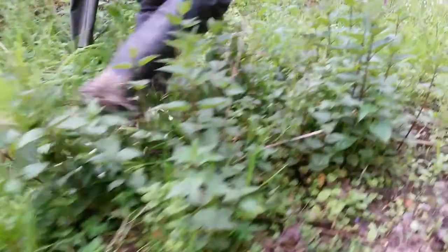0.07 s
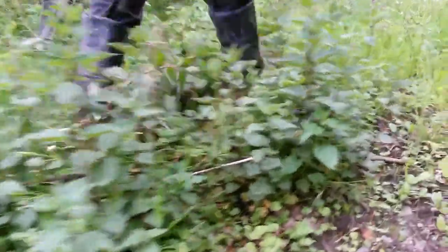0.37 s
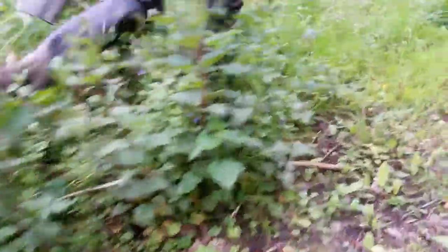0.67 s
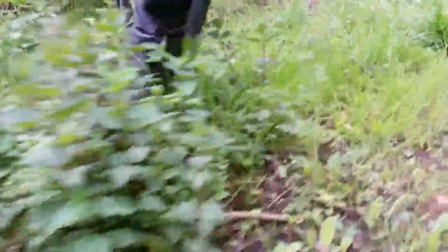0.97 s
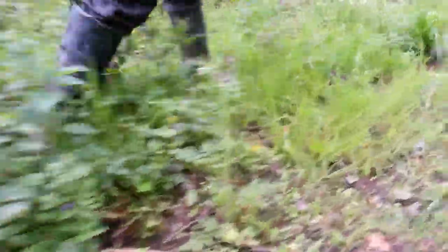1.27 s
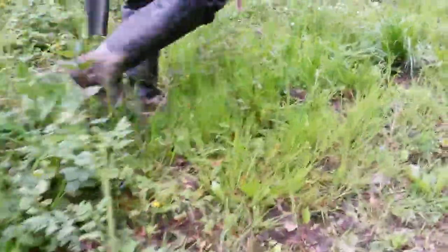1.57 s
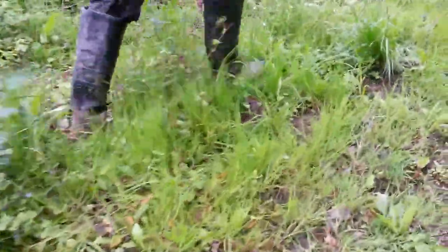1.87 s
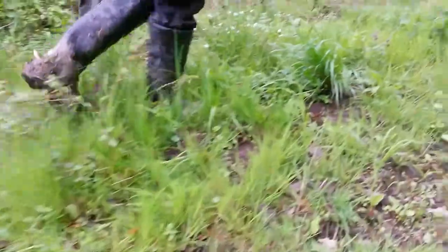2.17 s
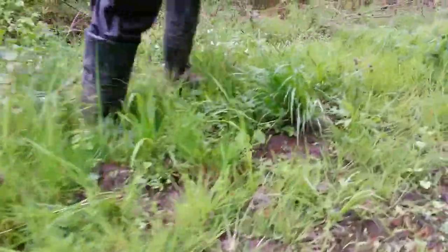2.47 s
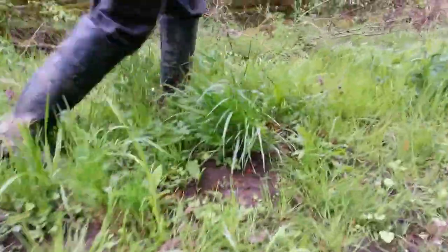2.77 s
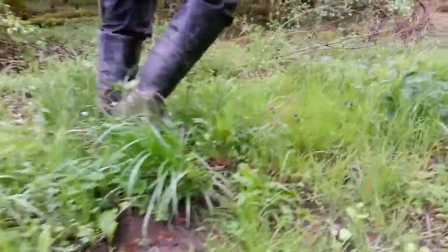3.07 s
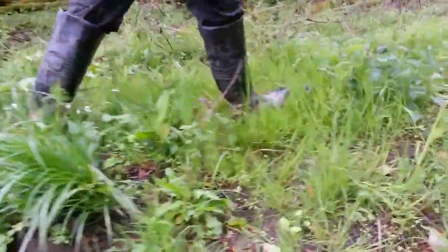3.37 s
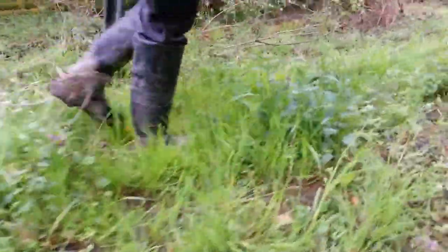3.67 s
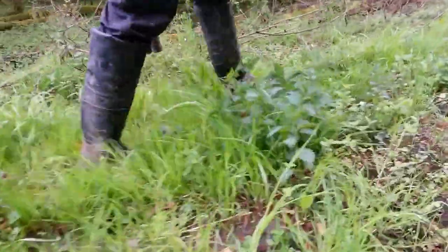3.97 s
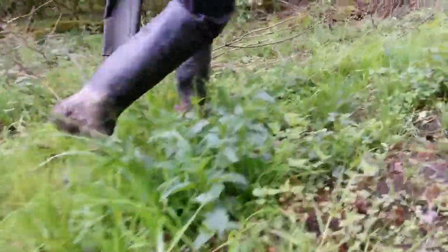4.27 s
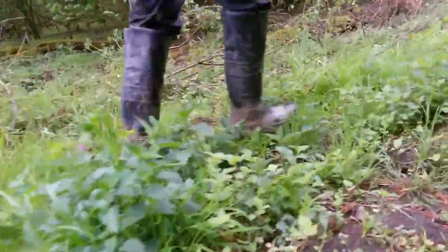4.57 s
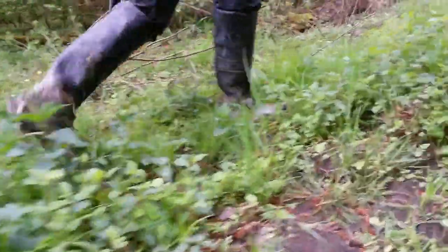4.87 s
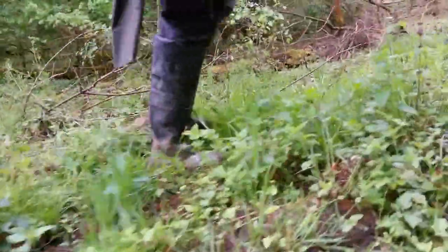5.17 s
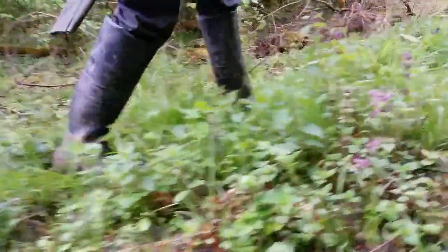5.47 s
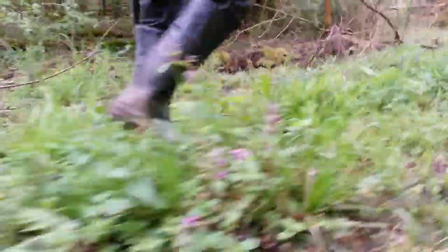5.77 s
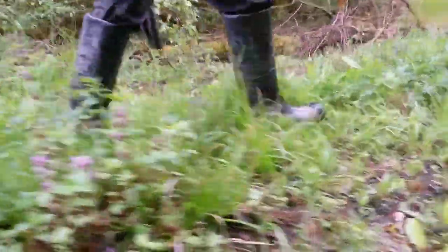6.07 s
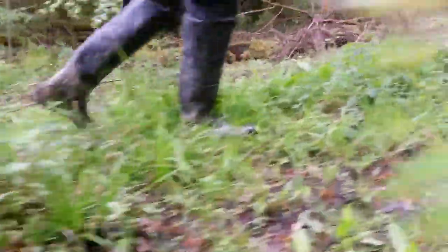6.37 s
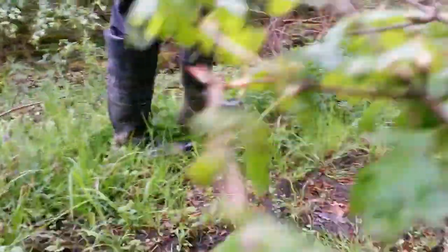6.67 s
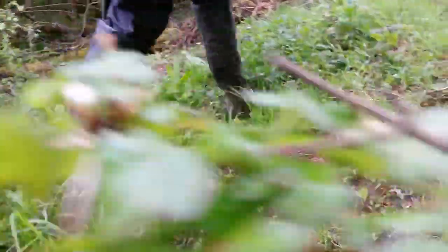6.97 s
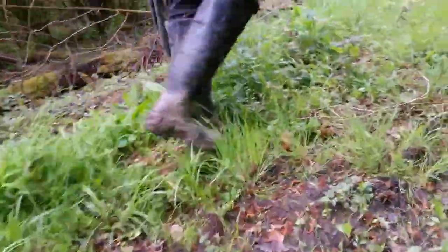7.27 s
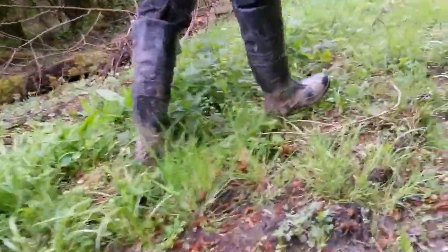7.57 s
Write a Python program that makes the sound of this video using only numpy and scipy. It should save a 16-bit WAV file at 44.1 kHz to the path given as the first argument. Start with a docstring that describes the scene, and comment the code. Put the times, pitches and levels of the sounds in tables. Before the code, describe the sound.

From the start, rubber boots push through grass and nettles at a forest edge, making uneven hissing swishes with a fine crackle of crushed stems, strongest in the first second. A soft, low air rumble puffs on the hand-held microphone following along. Twigs snap sharply just before 1 second, along with a knock of a sole on hard ground. The swishing continues, with more cracks around 3.2 and 3.7 seconds and a cluster of knocks and snaps from 5.3 to 5.6 seconds. From about 5.7 seconds a small, distant bird gives a few faint falling whistles. At 6.5 seconds the leaves of a low branch slap and scrape the microphone on the right, close and loud, with more taps until about 7.2 seconds. The steps are by then much fainter, and a quiet rustle lasts until nearly 8 seconds.

```python
"""Grass and nettles swish against rubber waders as someone walks along a forest edge.
Sliding friction makes the blades hiss and the crushed stems crackle, while air rumbles around a
hand-held camera that follows. Twigs crack by sudden fracture, and soles knock on roots and hard ground.
Later a small bird whistles far off, blurred by scattering from the trees. Near the end the leaves
of a low branch slap and scrape the camera at its right microphone port."""
import sys
import numpy as np
from scipy import signal
from scipy.fft import rfft, irfft, next_fast_len
from scipy.io import wavfile
from scipy.ndimage import uniform_filter1d, map_coordinates

SR = 44100
rng = np.random.default_rng(int(sys.argv[2]) if len(sys.argv) > 2 else 0)


def persist_wave(psi):
    """Save psi, clipped to +-1, as 16-bit WAV."""
    counts = np.round(np.clip(psi, -1, 1) * 32767).astype(np.int16)
    wavfile.write(sys.argv[1], SR, np.atleast_2d(counts).T)


N = 344421
TIME = np.arange(N) / SR


def from_db(db):
    """Amplitude ratio of a level in decibels."""
    return 10 ** (np.asarray(db) / 20)


def rms_one(x):
    """Normalisation: the mean of the channels gets rms 1."""
    return x / np.sqrt(np.mean(np.atleast_2d(x).mean(axis=0) ** 2) + 1e-20)


def unit_energy(pair):
    """Normalisation: each channel gets energy 1."""
    return pair / np.sqrt(np.sum(pair ** 2, axis=1, keepdims=True))


def in_time(curve):
    """Linear interpolation of a curve at every sample."""
    return np.interp(TIME, *np.transpose(curve))


def at_hz(points, hz):
    """Interpolation on a logarithmic frequency axis."""
    f, value = np.transpose(points)
    return np.interp(np.log(hz + 1), np.log(f + 1), value)


def add(track, s, sound):
    """Superposition: a short sound joins a track at time s."""
    i = int(s * SR)
    track[..., i:i + sound.shape[-1]] += sound[..., :N - i]


def band(x, hz, kind, order=2):
    """Butterworth filtering, maximally flat in the passband."""
    return signal.sosfilt(signal.butter(order, hz, kind, fs=SR, output="sos"), x + 1e-18)


def colour(x, spectrum, share=1, size=2048):
    """Minimum-phase filtering by a share of a spectrum's decibel values."""
    gain = from_db(share * at_hz(spectrum, np.linspace(0, SR / 2, size // 2 + 1)))
    cepstrum = irfft(np.log(gain))
    cepstrum[1:size // 2] *= 2   # folding the cepstrum makes the response causal
    cepstrum[size // 2 + 1:] = 0
    response = irfft(np.exp(rfft(cepstrum)))
    return signal.oaconvolve(np.atleast_2d(x), response[None], axes=1)[:, :N]


def drift(rate):
    """Random modulation: a line through Gaussian values drawn `rate` times a second."""
    return np.interp(TIME * rate, np.arange(N), rng.standard_normal(N))


# Likeness of the sound at the two ports: (frequency [Hz], correlation [0 to 1])
PORT_COHERENCE = [(60, 1), (300, 0.87), (1000, 0.63), (2500, 0.19), (6000, 0.19), (15000, 0.21)]
def spread(pair):
    """Spatial coherence: two independent signals are mixed to be more alike at long wavelengths."""
    size = next_fast_len(N)
    alike = np.clip(at_hz(PORT_COHERENCE, np.linspace(0, SR / 2, size + 1)), -.99, .99)
    angle = np.arcsin(alike) / 2
    spectra = rfft(pair, 2 * size)
    return irfft(np.cos(angle) * spectra + np.sin(angle) * spectra[::-1])[:, :N]


def crackle(per_s, size_db, grain_s):
    """Shot noise: tiny random contacts of uneven size each release a decaying burst."""
    contacts = rng.random(N) < per_s / SR
    sizes = from_db(size_db * np.minimum(rng.exponential(1, N), 4))
    power = signal.lfilter([1], [1, -np.exp(-1 / (grain_s * SR))], contacts * sizes ** 2 + 1e-18)
    return rms_one(np.sqrt(power) * rng.standard_normal((2, N)))


def friction(per_s, size_db, grain_s, smooth_db, flutter_db):
    """Stick-slip friction: many blades slide smoothly while single ones catch and let go."""
    sliding = from_db(smooth_db) * rms_one(rng.standard_normal((2, N)))
    return (sliding + crackle(per_s, size_db, grain_s)) * from_db(flutter_db * drift(60))


# A boot pushes through a clump: (time [s], duration [s], blade level [dB], stem level [dB])
BOOT_STROKES = [(0.0, 0.094, -31, -41), (0.124, 0.069, -33, -40), (0.251, 0.14, -39, -49),
                (0.522, 0.065, -41.5, -46.5), (0.665, 0.12, -41, -45.5), (0.781, .11, -34.5, -42.5),
                (0.899, 0.21, -38.5, -47), (1.276, .03, -45, -50), (1.328, 0.078, -41.5, -48),
                (1.445, 0.17, -40, -48.5), (1.727, 0.081, -45, -50), (1.948, 0.046, -48, -54),
                (2.113, .18, -46.5, -54.5), (2.287, 0.022, -42.5, -52), (2.478, 0.2, -45.5, -54),
                (2.847, 0.1, -44.5, -54.5), (2.949, 0.13, -40.5, -52.5), (3.076, 0.19, -44.5, -49.5),
                (3.556, 0.09, -39.5, -46.5), (3.666, 0.051, -43, -48), (3.82, .025, -44, -51),
                (3.907, 0.12, -43.5, -48.5), (4.26, 0.1, -48.5, -60), (4.435, 0.087, -43, -45.5),
                (4.564, 0.11, -46, -51), (4.695, 0.072, -46, -55), (4.868, 0.036, -51.5, -62),
                (5.051, 0.055, -50.5, -45.5), (5.104, 0.07, -40.5, -48), (5.246, 0.15, -38.5, -41.5),
                (5.405, 0.12, -46.5, -51.5), (5.636, 0.15, -51, -53.5), (5.863, 0.14, -44, -50),
                (5.971, 0.14, -43.5, -48), (6.114, 0.07, -53, -61), (6.81, 0.084, -57, -76),
                (6.908, 0.15, -60.5, -57.5), (7.51, 0.17, -61, -79), (7.695, 0.083, -60, -70)]
# Trodden plants rustle between strokes, fainter as the walker draws away: (time [s], level [dB])
SETTLING_RUSTLE = [(0, -40), (1.22, -50.5), (1.7, -47), (2.75, -49), (3.4, -47), (4.15, -51.5), (5.5, -49),
                   (6.4, -54), (7.25, -64.5), (7.81, -64.5)]
def stroke_levels(bend_s, release_s, stem_delay_s):
    """Incoherent addition: strokes and settling plants sum in power to blade and stem levels in dB."""
    settling_db = in_time(SETTLING_RUSTLE)
    blade_power = from_db(settling_db) ** 2
    stem_power = from_db(-52.5 + 0.68 * (settling_db - settling_db.mean())) ** 2
    t = TIME[:SR // 2]
    for s, length, blade_db, stem_db in BOOT_STROKES:
        # plants bend against the boot, then swing free
        push = np.minimum(t / bend_s, 1) * np.exp(-np.maximum(t - length, 0) / release_s)
        add(blade_power, s, (from_db(blade_db) * push) ** 2)
        add(stem_power, s + stem_delay_s, (from_db(stem_db) * push) ** 2)
    return 10 * np.log10(blade_power), 10 * np.log10(stem_power)


# Rustle of plants as heard through the camera's resonant microphone ports:
# (frequency [Hz], relative spectral level [dB])
RUSTLE_AT_PORTS = [(100, -21.5), (200, -11.5), (450, -10.5), (930, -9.5), (1180, -10.5), (1600, -7),
                   (2100, -9.5), (2800, -9), (3750, -4.5), (4600, -1.5), (5500, -8.5), (6500, -10),
                   (11000, -9.5), (12600, -15.5), (15400, -8.5)]
# Broad nettle leaves sound dull, fine grass bright: (time [s], top-octave gain [dB])
LEAF_BRIGHTNESS = [(0, -2.5), (1.2, 0), (2.8, 1.5), (4.3, -2), (5.7, 0), (7.81, 3)]
def strides(crossover_hz):
    """Friction noise: a swinging boot brushes blades; a landing boot crushes stems, lower and coarser."""
    sweep_db, crush_db = stroke_levels(bend_s=0.026, release_s=0.034, stem_delay_s=0.0033)
    contacts_per_s = 900 * from_db(0.55 * (sweep_db - sweep_db.mean()))   # faster sweeps meet more blades
    blades = friction(contacts_per_s, size_db=1.0, grain_s=0.00068, smooth_db=4.0, flutter_db=1.43)
    stems = friction(contacts_per_s * .4, size_db=3.0, grain_s=.0009, smooth_db=5.5, flutter_db=2.5)
    ticks = from_db(-4.5) * crackle(70, size_db=5.0, grain_s=0.00033)   # bent stalks spring back
    sweep = colour(spread(blades + ticks), RUSTLE_AT_PORTS)
    sweep = rms_one(band(sweep, crossover_hz, "high"))
    dull = signal.sosfiltfilt(signal.butter(2, 7500, fs=SR, output="sos"), sweep)
    sweep = dull + from_db(in_time(LEAF_BRIGHTNESS)) * (sweep - dull)
    crush = colour(spread(stems + .5 * blades + ticks), RUSTLE_AT_PORTS)
    crush = rms_one(band(crush, crossover_hz, "low"))
    return from_db(sweep_db + 0.38) * sweep + from_db(crush_db + 1.0) * crush


# Slow air moving past the camera: (time [s], level [dB])
AIRFLOW = [(0.0, -50), (1.1, -50), (2.2, -53), (3.6, -53.5), (4.3, -55), (5.4, -50), (6.5, -54.5),
           (7.2, -66), (7.81, -64.5)]
# Puffs on the ports as the camera is jolted: (time [s], level [dB])
JOLT_PUFFS = [(0.18, -46), (0.44, -49), (0.77, -48), (1.05, -44), (1.35, -54), (1.82, -54), (2.53, -44.5),
              (3.2, -53.5), (3.68, -53), (5.65, -54)]
# Pressure of the eddies: (frequency [Hz], relative spectral level [dB])
EDDY_SPECTRUM = [(12, -42), (20, -23), (48, 2), (70, -2), (129, -2), (166, -6), (344, -17.5), (400, -19),
                 (520, -43), (880, -120)]
def air(lumpy_db, swell_s):
    """Turbulence: eddies around the moving camera make a low, lumpy rumble that swells in puffs."""
    puff_power = sum(from_db(db) ** 2 * np.exp(-((TIME - s) / swell_s) ** 2) for s, db in JOLT_PUFFS)
    power = from_db(in_time(AIRFLOW)) ** 2 + puff_power
    shared = spread(rng.standard_normal((2, N)))
    local = 1.1 * rng.standard_normal((2, N))   # each port's own eddies
    rumble = rms_one(band(colour(shared + local, EDDY_SPECTRUM), 36, "high"))
    return np.sqrt(power) * from_db(1.5 + lumpy_db * drift(14)) * rumble


# Twigs and stalks breaking: (time [s], relative crack level [dB], relative body level [dB])
TWIG_BREAKS = [(0.365, -39, -44), (0.7979, -32, -51), (0.8672, -25, -33), (1.305, -44, -62),
               (2.0244, -42, -68), (3.1814, -33.5, -47), (3.708, -44, -38), (3.7175, -44, -32.5),
               (3.7357, -39, -60), (4.2135, -50, -43.5), (4.563, -39.5, -65), (4.89, -42.5, -56),
               (4.977, -57, -34.5), (4.989, -43, -64), (5.286, -47, -28.5), (5.5474, -41, -40),
               (5.583, -28.5, -26), (5.607, -44, -43), (5.6414, -44.5, -72), (5.934, -39, -62),
               (6.2202, -42, -71), (6.303, -42.5, -54), (7.072, -54, -70), (7.483, -53, -70),
               (7.7425, -50, -74)]
def snaps(crack_s, splinter_s, splinter_db, sappy_hz):
    """Fracture: stored strain escapes in a crack and brief splintering; thick twigs add a woody body."""
    crack, wood = np.zeros((2, N)), np.zeros((2, N))
    t = TIME[:SR // 25]
    decay = np.exp(-t / crack_s) + from_db(splinter_db) * np.exp(-t / splinter_s)
    for s, crack_db, wood_db in TWIG_BREAKS:
        burst = unit_energy(rng.standard_normal((2, len(t))) * decay)
        burst[:, 0] = 1   # the fracture itself, the same at both ports
        add(crack, s, from_db(crack_db) * burst)
        add(wood, s, from_db(wood_db) * burst)
    crack = band(crack, sappy_hz, "low", order=1)   # green stems break without much treble
    wood = band(wood, [750, 3000], "band")
    return colour(from_db(33.5) * crack + from_db(38.0) * wood, RUSTLE_AT_PORTS)


def thump(level_db, hz, t60):
    """Damped oscillation: the pitch sinks to `hz` as the contact relaxes."""
    t = TIME[:SR // 16]
    sag = 1 + 0.71 * np.exp(-t / 0.00051)
    return from_db(level_db - 60 * t / t60) * np.sin(2 * np.pi * hz * np.cumsum(sag) / SR)


# Boots on roots and hard ground: (time [s], level [dB], frequency [Hz], 60 dB decay time [s])
SOLE_IMPACTS = [(.931, -24, 735, 0.01), (3.23, -33, 650, 0.012), (5.286, -31.5, 246, 0.047),
                (5.363, -26, 750, 0.02), (5.376, -21.5, 670, 0.021), (5.424, -31.5, 266, 0.024)]
def knocks():
    """Impact excitation: a sole meets something hard under the plants and sets off a damped vibration."""
    track = np.zeros(N)
    for s, level_db, hz, t60 in SOLE_IMPACTS:
        add(track, s, thump(level_db, hz, t60))
    return track


# Falling whistles: (time [s], duration [s], start pitch [Hz], end pitch [Hz], relative level [dB])
BIRD_NOTES = [(5.743, 0.13, 3140, 2730, -59), (5.964, 0.097, 3130, 2900, -54.5),
              (6.109, 0.12, 3880, 3480, -58.5), (6.185, 0.093, 3940, 3530, -57.5),
              (6.261, 0.07, 2510, 2456, -49), (6.912, 0.042, 3150, 3040, -64),
              (7.199, 0.079, 3100, 2900, -69)]
def bird(scatter_db, warble_depth, warble_per_s):
    """Scattering: a far bird's warbling whistles arrive mostly by way of the trees."""
    song, t = np.zeros(N), TIME[:SR // 3]
    for s, length, start_hz, end_hz, level_db in BIRD_NOTES:
        along = np.minimum(t / length, 1)
        warble = warble_depth * np.interp(t * warble_per_s, np.arange(100), rng.standard_normal(100))
        hz = (start_hz + (end_hz - start_hz) * along) * (1 + warble)
        add(song, s, from_db(level_db) * np.sin(np.pi * along) * np.sin(2 * np.pi * np.cumsum(hz) / SR))
    trees = unit_energy(rng.standard_normal((2, len(t))) * np.exp(-t / 0.028))
    scattered = signal.oaconvolve(song[None], trees, axes=1)[:, :N]
    return .5 * song + from_db(scatter_db) * scattered


# Leaves striking the camera:
# (time [s], thump level [dB], frequency [Hz], 60 dB decay time [s], tick level [dB])
LEAF_IMPACTS = [(6.4883, -3, 255, 0.075, -8), (6.658, -12, 1330, 0.028, -18), (6.683, -6, 1410, 0.013, -6),
                (6.724, 0.5, 520, 0.034, -19), (6.732, -6.5, 1120, 0.017, -1),
                (6.874, -17, 685, 0.031, -2.5), (7.128, -18.5, 606, 0.019, -20),
                (7.139, -11, 480, 0.023, -12.5), (7.1576, -9, 640, 0.011, -0.5),
                (7.182, -5, 667, 0.018, -2.5)]
# Leaf contact on the case: (frequency [Hz], relative spectral level [dB])
CONTACT_SPECTRUM = [(30, -33), (150, -2.5), (400, 2), (1500, 2), (2600, -1), (3300, -0.5), (4500, 3.5),
                    (5800, -4.5), (7500, -6), (11000, -13), (15500, -9.5)]
def leaf_taps(tick_s, soft_hz):
    """Impact and compression: a leaf lands with a tick, and the air it traps at the port thumps."""
    thumps, ticks = np.zeros(N), np.zeros((2, N))
    t = TIME[:SR // 16]
    decay = 0.61 * np.exp(-t / tick_s) + 0.23 * np.exp(-t / 0.006)
    for s, thump_db, hz, t60, tick_db in LEAF_IMPACTS:
        add(thumps, s, thump(thump_db, hz, t60))
        tick = rng.standard_normal((2, len(t))) * decay
        tick[:, 0] = 3.8   # first contact
        add(ticks, s, from_db(tick_db) * tick)
    return band(thumps, 120, "high") + band(colour(ticks, CONTACT_SPECTRUM), soft_hz, "low", order=1)


# Leaves dragged over the camera:
# (time [s], duration [s], flutter level [dB], flutter frequency [Hz], scratch level [dB])
LEAF_DRAGS = [(6.49, 0.019, -9.5, 352, -22), (6.495, 0.019, -5, 1080, -39.5), (6.506, 0.013, -9, 524, -34),
              (6.52, 0.066, -30, 610, -36.5), (6.555, 0.013, -24, 1140, -46),
              (6.588, 0.0684, -40, 1220, -30.5), (6.658, 0.05, -24.5, 1340, -25.5),
              (6.708, 0.027, -22.5, 470, -30.5), (6.999, 0.032, -32, 610, -44.5),
              (7.151, 0.031, -24, 520, -34.5)]
def leaf_rubs(edge_s, width):
    """Friction-driven vibration: a leaf flutters around one pitch while its hairs scratch the case."""
    flutter, pressure = np.zeros(N), np.zeros(N)
    t = TIME[:SR // 6]
    for s, length, flutter_db, hz, scratch_db in LEAF_DRAGS:
        touch = np.clip(np.minimum(t, length + edge_s - t) / edge_s, 0, 1)
        shake = band(rng.standard_normal(SR // 3), [hz / (1 + width), hz * (1 + width)], "band")[-len(t):]
        shake /= np.sqrt(uniform_filter1d(shake ** 2, size=300) + 1e-12)   # steady pressure, even swing
        add(flutter, s, from_db(flutter_db) * touch * shake)
        add(pressure, s, from_db(scratch_db) * touch)
    scratch = rms_one(colour(crackle(3000, size_db=1.0, grain_s=0.0002), CONTACT_SPECTRUM))
    return flutter + from_db(3.0) * pressure * scratch


def arrive(pair, lag_s, sway_s):
    """Path difference: the right port lags the left (or leads) by a time that sways with the hand."""
    delayed = np.arange(N) - SR * (lag_s + sway_s * drift(4))
    return np.array([pair[0], map_coordinates(pair[1], [delayed], order=3)])


# Port imbalance for airborne sound: (frequency [Hz], left minus right [dB])
AIRBORNE_BALANCE = [(60, 2), (120, 0), (250, -3), (500, -5.5), (1200, -7), (1600, -9), (2700, -0.5),
                    (3700, 3), (4600, 18), (5600, 12), (7400, -3), (10500, -1.5), (13000, 1), (15300, 7)]
# Port imbalance for leaves touching the camera: (frequency [Hz], left minus right [dB])
CONTACT_BALANCE = [(60, -3), (110, -14), (200, -25), (380, -21.5), (700, -14), (1290, -17.5), (2380, -12),
                   (4400, 5), (8120, -17), (15000, -12.5)]
def ports(pair, balance):
    """Resonance: each port colours the sound its own way, taking nearly half of the imbalance."""
    return np.vstack([colour(pair[0], balance, share=0.48), colour(pair[-1], balance, share=-0.45)])


def scene():
    """Superposition: the walk and the bird arrive through the air; the branch touches the right port."""
    walk = strides(crossover_hz=2500) + knocks()
    walk += snaps(crack_s=0.00062, splinter_s=0.0087, splinter_db=-16.5, sappy_hz=12300)
    airborne = arrive(walk, lag_s=0.00015, sway_s=.00002) + air(lumpy_db=2.2, swell_s=0.075)
    airborne += bird(scatter_db=13.0, warble_depth=.04, warble_per_s=260)
    branch = leaf_taps(tick_s=0.00067, soft_hz=7000) + leaf_rubs(edge_s=0.0027, width=0.33)
    contact = arrive(branch, lag_s=-.0004, sway_s=.0001)
    return (from_db(0.5) * ports(airborne, AIRBORNE_BALANCE)
            + from_db(-9.5) * ports(contact, CONTACT_BALANCE))


def record(dry):
    """Soft saturation rounds off the loudest slap; a steep low-pass cuts the treble above 15.6 kHz."""
    rounded = 1.2 * np.tanh(dry / 1.2)
    return signal.sosfilt(signal.ellip(10, .2, 80, 15600, fs=SR, output="sos"), rounded)


dry = scene()
out = record(dry)
persist_wave(out)
```